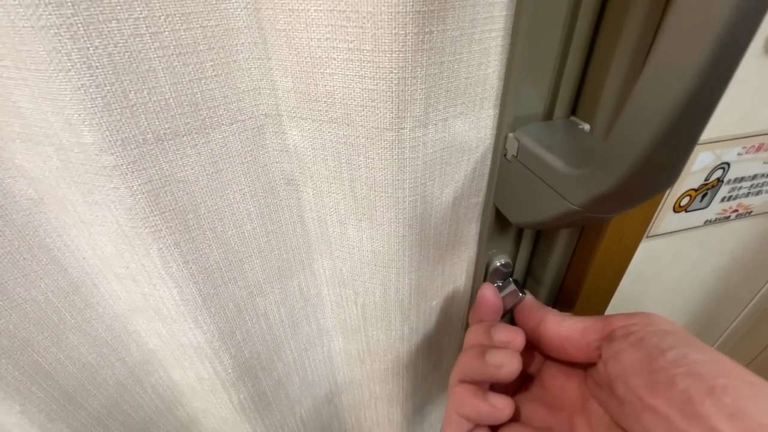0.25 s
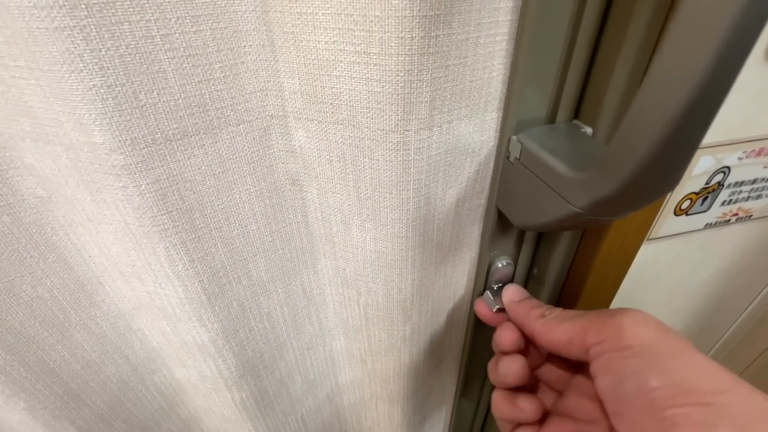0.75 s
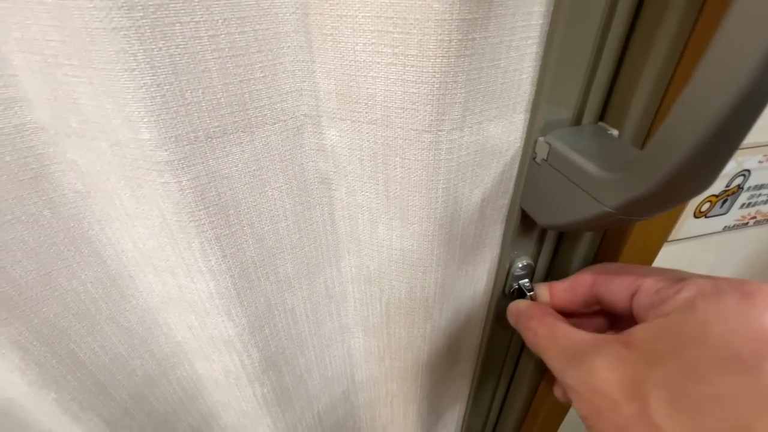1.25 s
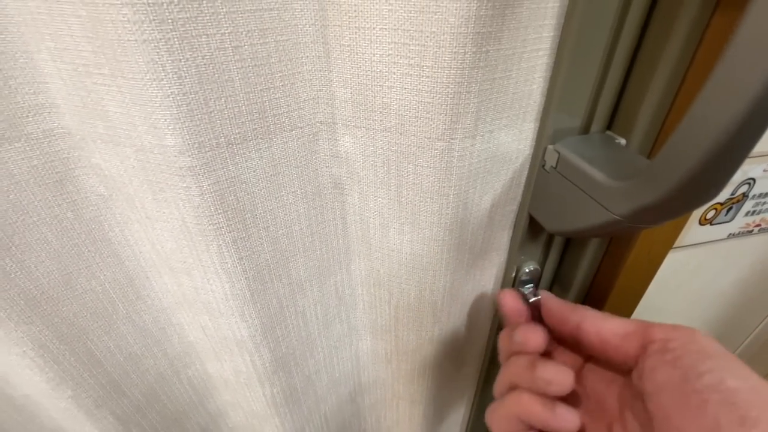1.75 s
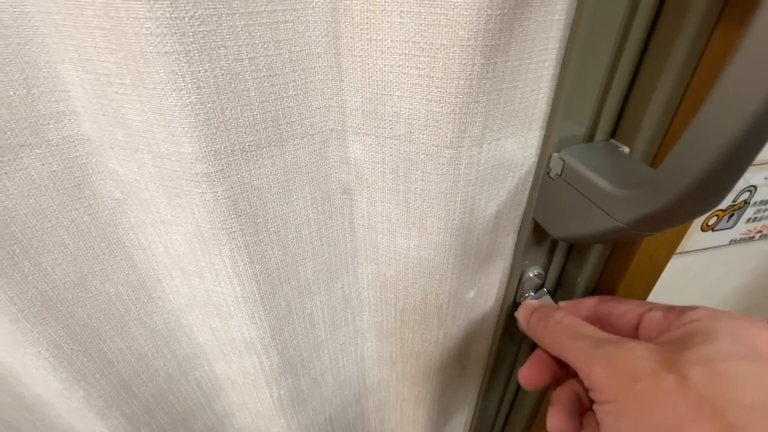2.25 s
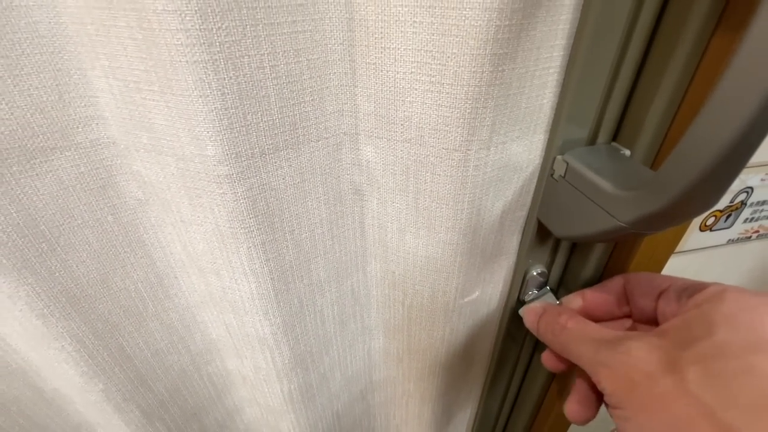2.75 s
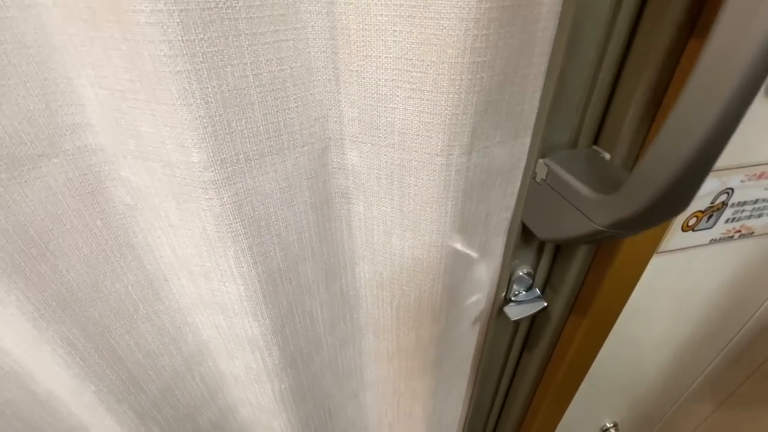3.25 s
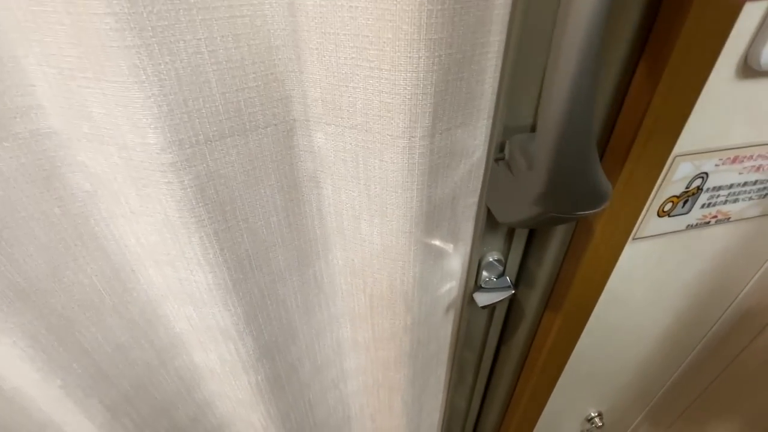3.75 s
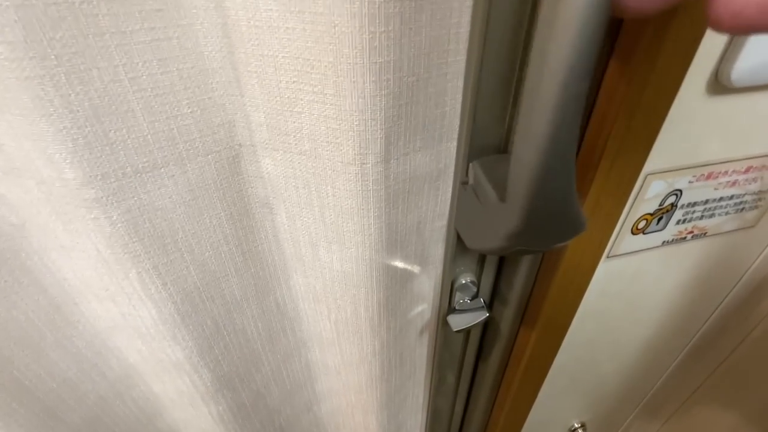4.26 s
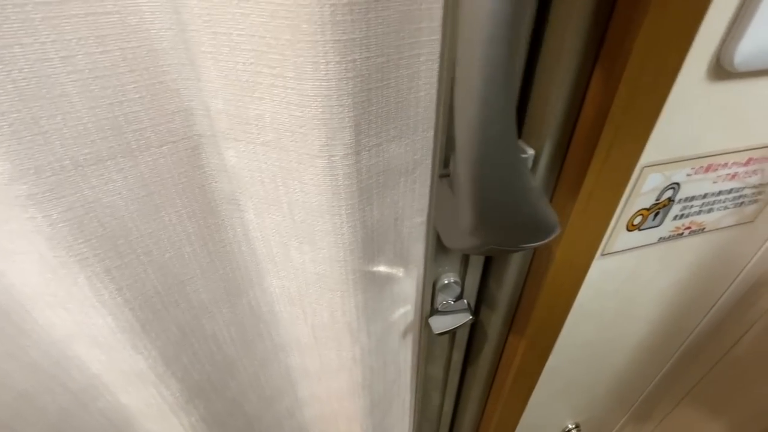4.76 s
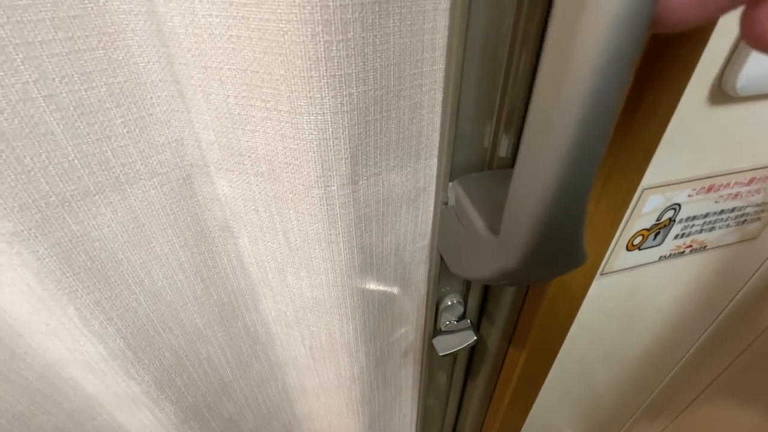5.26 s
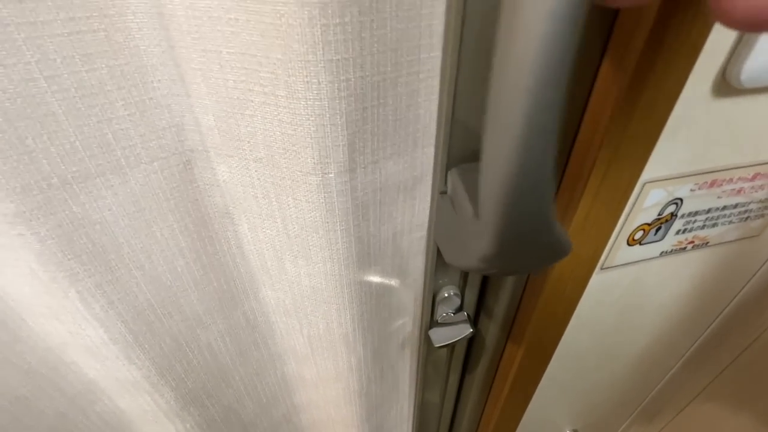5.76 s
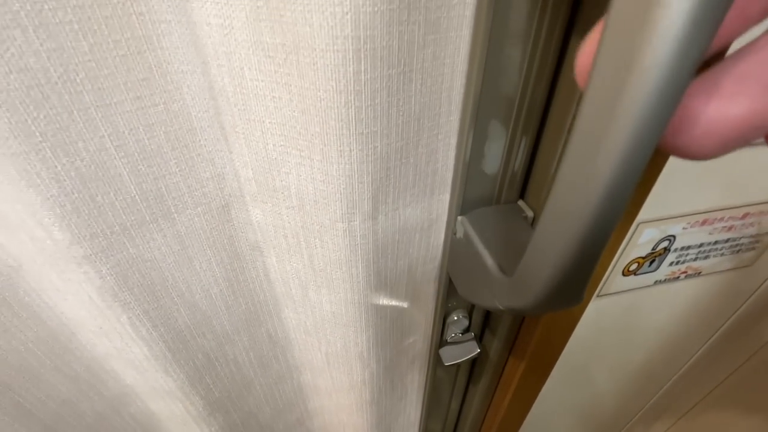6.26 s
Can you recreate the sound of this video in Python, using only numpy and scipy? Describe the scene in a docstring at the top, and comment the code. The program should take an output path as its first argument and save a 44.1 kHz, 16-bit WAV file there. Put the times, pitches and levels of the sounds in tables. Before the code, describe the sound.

Fingers turn a metal latch and tug a folding door, making sharp clicks, rattles and dull thumps in a small humming room.

```python
"""A small metal latch clicks close by as fingers turn it on a folding door, then work the plastic handle.
Each contact is a short, gritty blow that rings the latch, its bright edge, the hollow frame and the post.
A few blows thump the folding panels; the loud snap dies in a rattle, and skin rubs between the clicks.
A ventilation rumble fills the small room, which answers every click."""
import sys
import numpy as np
from scipy import signal
from scipy.fft import rfft, irfft, next_fast_len
from scipy.io import wavfile
from scipy.ndimage import uniform_filter1d, map_coordinates

SR = 44100
rng = np.random.default_rng(int(sys.argv[2]) if len(sys.argv) > 2 else 0)


def output_pcm(signal):
    """Save a mono or channel-first signal as 16-bit PCM at the path in sys.argv[1].

    Samples are clipped to [-1, 1] before scaling.
    """
    pcm = np.clip(np.atleast_2d(signal).T, -1, 1) * 32767
    wavfile.write(sys.argv[1], SR, np.round(pcm).astype(np.int16))


N = 286650


def amp(db):
    """Decibels to gain."""
    return 10 ** (np.asarray(db) / 20)


def unit_rms(x):
    """The signal scaled to rms 1."""
    return x / np.sqrt(np.mean(x ** 2) + 1e-20)


def curve_at(points, hz):
    """Read a (freq_hz, value) curve along a log frequency axis."""
    freqs, values = np.transpose(points)
    return np.interp(np.log(hz + 1), np.log(freqs + 1), values)


def wobble(rate_hz):
    """A smooth random modulator."""
    knots = rng.standard_normal(int(N * rate_hz / SR) + 4)
    return map_coordinates(knots, [np.arange(N) * rate_hz / SR])


def filtered(x, response):
    """Filter by a complex response, given as a function of frequency."""
    size = next_fast_len(x.shape[-1] + 8192)
    return irfft(rfft(x, size) * response(np.fft.rfftfreq(size, 1 / SR)), size)[..., :x.shape[-1]]


def resonances(modes):
    """Response of a bank of (pitch_hz, width_hz, gain_db) resonators, alternating in polarity."""
    return lambda hz: sum((-1) ** k * amp(db) * 1j * hz * width / (pitch ** 2 - hz ** 2 + 1j * hz * width)
                          for k, (pitch, width, db) in enumerate(modes))


def patchy_noise(spectrum, correlation, patchy_db):
    """Shaped stereo noise of rms 1 whose level flickers in patches of time and frequency."""
    bins = signal.stft(rng.standard_normal((2, N)), nperseg=512)[2]
    patches = uniform_filter1d(rng.standard_normal(bins.shape[1:]), size=7, axis=0)
    patches = uniform_filter1d(patches, size=9, axis=1)
    pair = signal.istft(bins * amp(patchy_db * unit_rms(patches)), nperseg=512)[1][:, :N]

    def mid_side_gains(hz):
        angle = np.arccos(np.clip(curve_at(correlation, hz), -1, 1)) / 2
        return amp(curve_at(spectrum, hz)) * [np.cos(angle), np.sin(angle)]

    mid, side = filtered(pair, mid_side_gains)
    return unit_rms(np.array([mid + side, mid - side]))


# Tone of the air rumble: freq_hz, density_db
AIR_SPECTRUM = [(12, -70.5), (20, -47), (27, -27.5), (42, -14), (98, -3), (124, -9.5), (206, -12),
                (265, -27), (387, -30), (526, -39), (619, -30), (677, -43), (783, -37.5), (1010, -52),
                (1500, -53), (1950, -87), (3300, -120)]
# How alike its two channels are: freq_hz, correlation
AIR_CORRELATION = [(60, 0.94), (240, 0.66), (950, 0.03), (3770, 0.13), (15000, 0.073)]
# Its stereo balance: freq_hz, left_over_right_db
AIR_BALANCE = [(30, -0.5), (60, -1.5), (170, -4.5), (350, 1.5)]


def ventilation():
    """Moving air lays down a gently wavering rumble, its bass leaning right."""
    air = patchy_noise(AIR_SPECTRUM, AIR_CORRELATION, patchy_db=-0.93)
    air = filtered(air, lambda hz: amp(curve_at(AIR_BALANCE, hz) * [[.5], [-.5]]))
    return amp(-44.0 + 0.2 * wobble(1.0) + 1.5 * wobble(6)) * air


# Hits on the hardware, the last three levels relative to the latch:
# start_s, latch_db, post_db, frame_db, edge_db
CLICKS = [(0.1102, -59.5, 3, -3.5, -15), (0.274, -80.5, 3, 20, -15), (0.505, -12, -12, -7.5, -1),
          (0.5184, -8.5, -11, -6, -2), (0.5419, -28, -15, -19, 9), (0.7526, -63, -18, 8, -21.5),
          (0.8132, -52.5, -10, 6, -3), (0.8499, -54, -19, 9, 0), (0.9207, -59.5, 11.5, 16, -12),
          (0.949, -40.5, 2.5, 2.5, -19), (0.9696, -57.5, 10, -15, -15), (1.1082, -34, -4.5, -6.5, 9),
          (1.1655, -40.5, -31, -3, -5.5), (1.29, -65.5, 4, 13, -25.5), (1.3281, -56, 10, 14.5, -31.5),
          (1.73, -59, 14.5, 18, -1), (1.7717, -56.5, 3, 10.5, -25), (1.978, -24, -23.5, -19, -1.5),
          (2.0044, -52.5, 3, 2.5, 8.5), (2.0763, -54.5, -8, 6, -15), (2.1062, -37, -12.5, -1.5, -12),
          (2.7413, -50, -14.5, 5.5, -21), (2.7597, -47.5, -2.5, 4.5, -15), (2.796, -34, -3, 0.5, -6),
          (3.1861, -45, -8, 4.5, 0.5), (3.1924, -44.5, 10.5, 19.5, 6.5), (3.252, -59, 6, 17, 11),
          (3.2951, -32, -3, 1.5, -8.5), (3.3074, -31.5, 4.5, 0.5, -11), (3.6379, -54, 18, -3, -11),
          (3.6674, -36.5, -18, -8, -12.5), (3.717, -62.5, 14.5, 1, -6), (3.781, -46.5, -11, -4, -7),
          (3.998, -36.5, 10, -5.5, -10.5), (4.0548, -45, -33.5, 8.5, -18), (4.0709, -23, -13, -4.5, -7),
          (4.159, -39.5, -24, -0.5, -9.5), (4.209, -37, 1, 4.5, -7), (4.2266, -54, 21.5, -1, -12),
          (4.378, -56, -2, -7, -2.5), (4.3913, -41, 9.5, -7, -8.5), (4.6834, -64, -7.5, -15.5, 4),
          (4.9574, -44.5, 9, -7.5, -4), (5.1401, -68.5, 21, 9.5, -15), (5.25, -75, 15, 3, -16),
          (5.3275, -53, 14.5, 11.5, -10.5), (5.86, -51, 7, 6, -21), (5.9575, -36.5, -14, -9.5, -21),
          (5.9607, -43, -1, 3.5, -12), (6.2504, -62, 10.5, -9, 2.5), (6.2644, -64, 8, 9, 9),
          (6.2957, -61.5, 1.5, 2, 7)]
# Ring of the metal latch: pitch_hz, width_hz, gain_db
LATCH_MODES = [(2319, 470, 3.5), (2853, 560, 1), (3360, 340, -0.5), (4010, 250, 0.5), (4710, 920, -1.5)]
# Knock of the door post: pitch_hz, width_hz, gain_db
POST_MODES = [(308.3, 130, -6.5), (529.4, 160, -6.5), (885, 450, -4.5), (1057, 330, -1.5)]
# Honk of the hollow frame: pitch_hz, width_hz, gain_db
FRAME_MODES = [(1468, 100, -2.5), (1646, 110, 3), (1960, 770, -11.5)]
# Bright edge of the click: pitch_hz, width_hz, gain_db
EDGE_MODES = [(6250, 1200, -1), (6740, 600, 2.5), (7680, 680, 4.5), (9000, 1500, -7), (10060, 360, -1.5),
              (16400, 1400, -7.5)]
# Stereo phase of the direct clicks: freq_hz, left_lead_rad
CLICK_PHASE = [(300, -2), (2000, 1.34), (6500, .5), (8000, -5.5), (13500, -6.5)]


def latch_clicks():
    """Each contact is a dying burst of micro-impacts that rings the door's parts and the room."""
    start_s, latch_db, post_db, frame_db, edge_db = np.transpose(CLICKS)[..., None]
    t = np.arange(4096) / SR
    snaps = post_db < 3  # hard contacts snap; knocks that mostly move the post crunch for longer
    attack_s, t60_s = np.where(snaps, .0004, .004), np.where(snaps, .019, .035)
    shape = (len(start_s), len(t))
    grit = rng.standard_normal(shape) * amp(3 * rng.standard_normal(shape))
    blow = grit * amp(-60 * t / t60_s) * (1 - np.exp(-t / attack_s))

    # The place struck favours one range of latch modes; the hardest blows lower and widen it.
    turning = start_s < 3.5  # the latch is turned first, then the door is tugged
    force_db = np.maximum(latch_db + 20.5, 0)  # excess over -20.5 dB
    focus_hz = np.where(turning, 3900, 3000) - 74.5 * force_db
    width_hz = np.where(turning, 1700, 2280) * amp(force_db)
    focus = resonances([(focus_hz, width_hz, 0)])
    latch_blow = filtered(blow, lambda hz: focus(hz) ** 2)

    direct = send = 0
    for modes, drive, part_db, send_db in (
            (LATCH_MODES, latch_blow, 0, 0),
            (POST_MODES, blow, post_db, 0),
            (FRAME_MODES, blow, frame_db, -6),  # faces the microphone, so sends less into the room
            (EDGE_MODES, blow, edge_db, 0)):
        # Each part radiates only in its own range.
        band = [(np.mean(modes, axis=0)[0], modes[-1][0] - modes[0][0] + 300, 0)]
        ring = filtered(filtered(drive, resonances(modes)), resonances(band))
        ring = amp(latch_db + part_db) * ring / np.abs(ring).max(axis=1, keepdims=True)
        direct = direct + ring
        send = send + ring * amp(send_db)
    direct = direct[:, None] * amp([[1.2], [-1.2]])  # slightly left
    direct = filtered(direct, lambda hz: np.exp(1j * curve_at(CLICK_PHASE, hz) * [[.5], [-.5]]))
    reverb = room(amp(-9 + 0.35 * force_db) * send)  # wetter when a hard blow rattles the whole door

    out = np.zeros((2, N + SR))
    for onset, click, tail in zip(np.round(start_s[:, 0] * SR).astype(int), direct, reverb):
        out[:, onset:onset + click.shape[1]] += click
        out[:, onset:onset + tail.shape[1]] += tail
    return out[:, :N]


# Decay of the small room: freq_hz, t60_s
ROOM_DECAY = [(300, 0.49), (1500, 0.18), (5000, 0.1), (12000, 0.093)]


def room(clicks):
    """The room gives each click its own diffuse tail, the highs dying first."""
    hz, t, bins = signal.stft(rng.standard_normal((len(clicks), 2, SR // 3)), SR, nperseg=256)
    decay = amp(-60 * t / curve_at(ROOM_DECAY, hz)[:, None])
    tails = signal.istft(bins * decay, SR, nperseg=256)[1]
    tails = tails / np.linalg.norm(tails, axis=-1, keepdims=True)
    predelayed = np.pad(clicks, ((0, 0), (150, 0)))
    return signal.fftconvolve(predelayed[:, None], tails, axes=-1)


# Blows that reach the folding panels: start_s, level_db
PANEL_HITS = [(0.522, -34), (4.019, -29.5), (4.229, -30), (4.965, -27.5)]
# Low body of the panels: pitch_hz, width_hz, gain_db
PANEL_MODES = [(94.36, 46, 0.5), (174, 70, -1.5)]


def panel_thumps():
    """Blows shake the folding panels for a few hundredths of a second."""
    t = np.arange(SR // 4) / SR
    out = np.zeros(N + SR)
    for start_s, level_db in PANEL_HITS:
        shove = rng.standard_normal(len(t)) * t * amp(-60 * t / 0.062)
        shake = filtered(shove, resonances(PANEL_MODES))
        thump = filtered(shake, resonances([(139.64, 600, 0)]))  # broad band-pass keeps it dull
        out[round(start_s * SR):][:len(t)] += amp(level_db) * thump / np.abs(thump).max()
    return out[:N] * amp([[-1.2], [1.2]])  # slightly right


HANDLE_FROM_S = 3.17  # the fingers move from latch to handle
# The dying rattle after the loud snap, then strokes of skin on latch and handle:
# start_s, length_s, hiss_db, scrape_db
RATTLE_AND_STROKES = [(0.552, 0.027, -42, -46.5), (0.663, .24, -64.5, -63), (0.935, 0.29, -59, -64),
                      (1.322, .18, -76, -74), (1.55, 0.2, -61.5, -68.5), (1.82, 0.13, -92, -70.5),
                      (1.996, 0.32, -63, -64.5), (2.761, 0.37, -68, -67), (3.2, 0.17, -58, -52.5),
                      (3.48, 0.19, -77.5, -68), (3.655, 0.1, -71.5, -62), (4.021, 0.099, -62, -58.5),
                      (4.141, 0.099, -65, -58.5), (4.385, 0.031, -72, -63.5), (4.944, .06, -68.5, -61),
                      (5.074, 0.15, -85.5, -70.5), (5.346, 0.018, -85, -68.5), (5.404, 0.16, -89, -75),
                      (5.84, 0.31, -72.5, -65), (6.261, 0.088, -72.5, -69)]


def swell_envelopes():
    """Gains of hiss and scrape: each swell peaks at start_s, sags while it lasts and is released."""
    start_s, length_s, hiss_db, scrape_db = np.transpose(RATTLE_AND_STROKES)[..., None]
    t = np.arange(0, N, 32) / SR
    # The handle is leaned into; sounds on the latch start at once.
    rise_db_per_s = np.where(start_s > HANDLE_FROM_S + .1, 140, 499.5)
    sag_db_per_s, release_db_per_s = 26.5, 221.5
    shape_db = (-rise_db_per_s * np.maximum(start_s - t, 0)
                - sag_db_per_s * np.clip(t - start_s, 0, length_s)
                - release_db_per_s * np.maximum(t - start_s - length_s, 0))
    gains = []
    for swell_db, resting_db in (hiss_db, -87), (scrape_db, -84):
        power = np.sum(amp(swell_db + shape_db) ** 2, axis=0) + amp(resting_db) ** 2
        gains.append(np.interp(np.arange(N) / SR, t, np.sqrt(power)))
    return gains


# Hiss of the metal latch, rattling or rubbed: freq_hz, density_db
METAL_HISS = [(1290, -35), (2200, -2.5), (3290, -0.5), (3750, -4), (5570, -5), (6400, 0), (7650, -7.5),
              (11300, -10), (12700, -21), (14000, -38)]
# Hiss of skin on the plastic handle: freq_hz, density_db
PLASTIC_HISS = [(1500, -18), (2600, 0.5), (4200, -3.5), (6300, -3.5), (9200, -12.5), (10500, -8),
                (11800, -12.5), (14000, -40)]
# Dull scrape under both: freq_hz, density_db
DULL_SCRAPE = [(600, -29.5), (900, -3), (1250, -8), (1450, -9), (1620, -4), (1850, -8.5), (2250, -9.5),
               (3500, -35)]


def rattle_and_rubs():
    """The snap's rattle dies, then skin slides on metal and plastic: uneven hiss over a duller scrape."""
    hiss_gain, scrape_gain = swell_envelopes()
    flutter = wobble(23)
    plastic = patchy_noise(PLASTIC_HISS, correlation=[(3000, 0.14)], patchy_db=2.0)
    metal = patchy_noise(METAL_HISS, correlation=[(3000, 0.18)], patchy_db=1.4)
    hiss = np.where(np.arange(N) / SR > HANDLE_FROM_S, plastic, metal)
    scrape = patchy_noise(DULL_SCRAPE, correlation=[(1500, 0.051)], patchy_db=2.0)
    roughness_db = 3.0 * wobble(82)
    return hiss_gain * amp(1.1 * flutter) * hiss + scrape_gain * amp(1.4 * flutter + roughness_db) * scrape


def scene():
    """Clicks, thumps, rattle and rubs over a bed of room air."""
    return amp(3.5) * (latch_clicks() + panel_thumps() + rattle_and_rubs() + ventilation())


# Top-octave tone of the microphone: freq_hz, gain_db
MIC_TONE = [(12000, 3.5), (13500, -11.5), (16000, -8.5)]


def record(dry):
    """The loudest peaks saturate softly; the microphone dulls the top octave, then cuts off steeply."""
    ceiling, cutoff_hz = 0.95, 16600
    saturated = dry / (1 + np.abs(dry / ceiling) ** 6) ** (1 / 6)

    def microphone(hz):
        tone_db = curve_at(MIC_TONE, hz) - curve_at(MIC_TONE, 1000)  # unity gain at 1 kHz
        return amp(tone_db) / (1 + (hz / cutoff_hz) ** 150)

    return filtered(saturated, microphone)


dry = scene()
out = record(dry)
output_pcm(out)
```